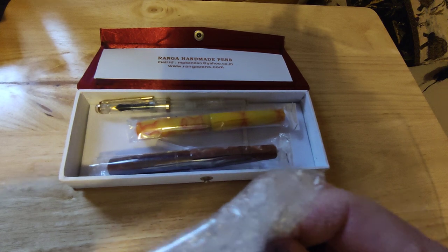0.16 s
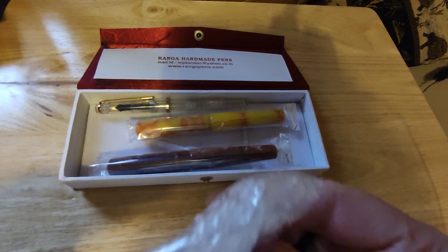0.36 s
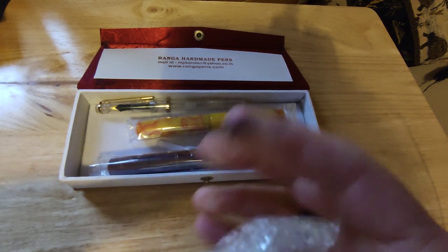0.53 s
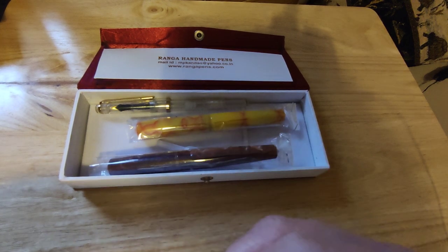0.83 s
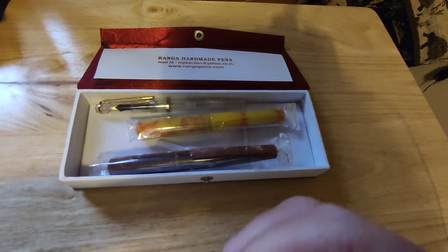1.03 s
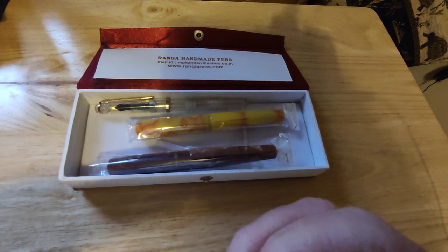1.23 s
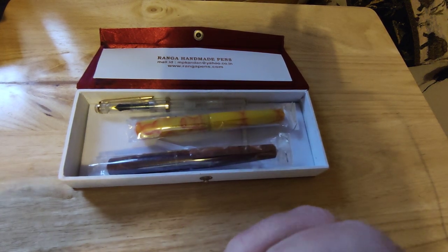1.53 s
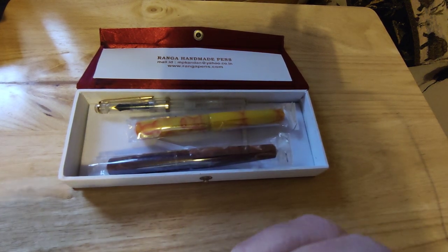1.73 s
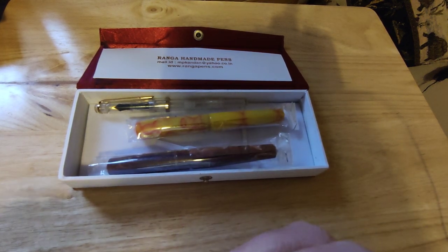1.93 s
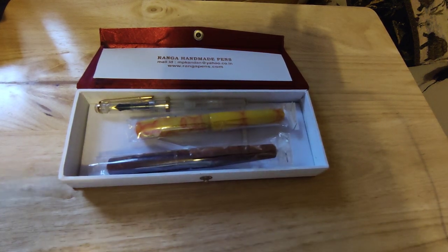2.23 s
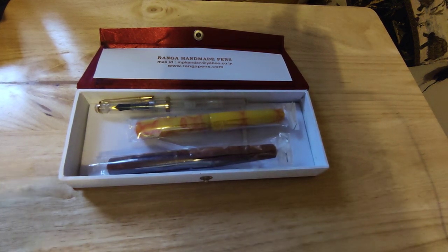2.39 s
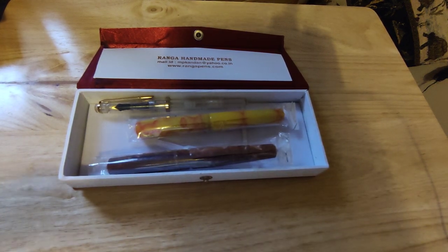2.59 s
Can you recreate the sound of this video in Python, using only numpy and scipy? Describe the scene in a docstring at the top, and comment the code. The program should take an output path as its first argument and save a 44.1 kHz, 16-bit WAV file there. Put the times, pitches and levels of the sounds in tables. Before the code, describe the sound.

Bubble wrap is handled close to the microphone in a small room. Two hard pops come first, then the plastic slides through the fingers with a fine crinkle and irregular runs of sharp snaps, over a faint low rumble.

```python
"""Bubble wrap in the hands

Close to the microphone, in a small room, the film gives two hard pops, then slides through the fingers
with a fine crinkle and one scuff while its creases buckle in runs of sharp snaps. Each pop or snap is a
click and a flutter that ring a facet of the film; the crinkle is thousands of tiny creases giving way.
Under it lie a slow swell of rumble, room tone and a faint hum."""
import sys
import numpy as np
from scipy import signal
from scipy.fft import rfft, irfft, next_fast_len
from scipy.io import wavfile

SR = 44100
rng = np.random.default_rng(int(sys.argv[2]) if len(sys.argv) > 2 else 0)


def log_audio(samples):
    """Write samples as a 16-bit WAV file to the path given in sys.argv[1]."""
    # one column per channel
    frames = np.atleast_2d(samples).T
    # limit to full scale, then quantise
    limited = np.clip(frames, -1, 1)
    pcm = np.round(limited * 32767).astype(np.int16)
    wavfile.write(sys.argv[1], SR, pcm)


N = 121275

# The hum's tones. Each row: pitch in Hz, rms level in dB.
HUM_TONES = [(53, -51), (99.7, -63.5), (221, -62.5)]
# The rumble's fader as the hands move. Each row: time in seconds, level in dB before its trim.
RUMBLE_FADER = [(0, -26), (.15, -38), (.3, -28.5), (.5, -26.5), (.65, -44), (1.05, -36), (1.45, -34),
                (1.65, -27.5), (1.8, -31), (2.08, -40), (2.33, -19.5), (2.55, -36.5), (2.75, -39)]
# The handling faders. Each row: time in seconds, then treble and low rub levels in dB before their trims.
HANDLING_FADERS = [(0, -47, -55), (.08, -49.5, -60), (.24, -50.5, -62), (.28, -47, -48), (.33, -56.5, -64),
                   (.39, -50, -59), (.44, -36.5, -59), (.48, -51, -61), (.51, -40.5, -52.5),
                   (.56, -49.5, -57), (.64, -47, -54), (.69, -37.5, -48.5), (.75, -41, -46.5),
                   (.78, -40.5, -50.5), (.87, -43, -49), (.96, -35.5, -47.5), (1.01, -42, -45.5),
                   (1.07, -33.5, -46.5), (1.14, -37.5, -44), (1.21, -35.5, -50), (1.27, -38, -45.5),
                   (1.31, -39, -46.5), (1.34, -42, -51), (1.38, -39, -47), (1.45, -49, -63),
                   (1.52, -42, -66), (1.56, -38.5, -44), (1.65, -42, -51), (1.7, -45, -61),
                   (1.76, -52, -58), (1.83, -52.5, -79), (1.9, -63, -46), (1.96, -39, -55),
                   (2.05, -53, -69), (2.14, -49, -62), (2.2, -34.5, -55), (2.29, -38, -51.5),
                   (2.39, -53.5, -66.5), (2.46, -45, -59), (2.52, -42.5, -65), (2.58, -40, -49),
                   (2.63, -46, -65), (2.75, -47, -57.5)]
# An EQ curve for each layer and for the room's tail. Each row: frequency in Hz, relative gain in dB.
RUMBLE_EQ = [(2, 0), (6, 2.5), (12, -19), (20, -15), (40, -50), (80, -49), (300, -115), (2000, -120)]
ROOM_TONE_EQ = [(15, 0.5), (35, 8), (70, -9), (100, -9.5), (170, -10), (220, -14.5), (400, -18.5),
                (1000, -19), (2200, -48), (7000, -24), (16000, -36)]
TAIL_EQ = [(100, -3.5), (300, -2), (1200, 5), (2100, -6), (3100, -0.5), (5500, -1), (7200, -1.5),
           (8500, -7.5), (9800, -1.5), (14500, -0.5), (16500, -3.5)]
RUB_EQ = [(60, 4.5), (130, 4.5), (220, 1.5), (400, 3), (700, -2), (1000, -2.5), (1400, -6), (1800, -8.5),
          (2200, -9.5), (4000, -40), (16000, -46)]
CRINKLE_EQ = [(300, -25), (1300, -12), (2100, -12.5), (2500, -7), (3300, -2), (4000, -4), (5500, -2.5),
              (7200, 1), (8500, -3.5), (9800, -3), (11500, -4), (14500, -8), (16000, -12)]
SNAP_EQ = [(100, -11.5), (250, 3), (450, 3), (800, 0.5), (1300, 4), (1750, -2.5), (2150, -16), (2550, -7),
           (3200, 1), (5000, -1.5), (6000, -5), (7400, 0), (8500, -9), (9700, 1), (11500, -1.5),
           (14500, -4.5), (16000, -19)]
POP_EQ = [(60, -3), (150, -10), (300, 2), (500, 3.5), (1000, 4), (1300, 1.5), (2000, -6.5), (3000, -2),
          (5500, 6), (7300, 2.5), (8500, -1.5), (10500, -6.5), (14500, 4.5), (16500, -14)]
# Cues for the buckling creases and the hard pops. Each row: start in seconds, crack level in dB before
# any trim, body and fizz levels in dB relative to the crack, ring pitch in Hz.
SNAP_CUES = [(0.0021, -17, -17.5, -17, 4460), (0.2564, -29, -22, -2, 6760),
             (0.3219, -46.5, -11, 6.5, 11000), (0.3497, -38.5, 1, -8, 3560), (0.3891, -37.5, -16, -1, 7160),
             (0.4112, -34.5, -4.5, -13, 3230), (0.4323, -35.5, -4, -14, 3260),
             (0.4387, -23.5, -19, -10, 6500), (0.4595, -34, -10, -3, 6860),
             (0.5994, -28.5, -34, -4.5, 6500), (0.6001, -28.5, -20, -12, 5260),
             (0.6877, -28.5, -7, -17, 6800.0), (0.7161, -29, -4.5, -15, 4300.0),
             (0.7317, -31.5, -18, -9, 7150), (0.8507, -44.5, -6, 12.5, 11000),
             (1.0282, -25.5, -16, -5, 6700.0), (1.0532, -27, -22, -5, 6400), (1.064, -14.0, -26, -19, 5940),
             (1.0735, -19, -15, -22, 3700), (1.075, -22.5, -28, -21, 4400), (1.0854, -24, -15, -16, 6450),
             (1.1521, -25.5, -5, -21, 7300.0), (1.1984, -26, -2, -4, 7500.0),
             (1.2042, -23.5, 0, -4, 7400.0), (1.2171, -25, -9, -2, 6600.0),
             (1.2456, -27.5, -11.5, -15, 6740), (1.2845, -35.5, 9, -7, 3000.0),
             (1.2964, -24.5, 0, -2, 7650), (1.3061, -27.5, -11, 0, 6940), (1.3118, -32.5, -19, 2, 7100),
             (1.4122, -38, -22, 5, 10300), (1.4241, -34.5, -15, 5, 9900.0), (1.4319, -24.0, -17, 2.5, 2900),
             (1.4758, -24.5, -14, -13, 7500), (1.504, -30.5, -13, -6, 6700), (1.5442, -19, -6.5, 5, 9000),
             (1.559, -16, -9, -3.5, 7150), (1.5724, -32, -17, 7, 9800.0), (1.5927, -22, -14, -4, 9600),
             (1.6196, -21.5, -10, -1, 7100.0), (1.6214, -19, -13.5, -1, 7100.0),
             (1.6293, -17.5, -16, -3, 7100.0), (1.6391, -18, -13, 0, 7300.0),
             (1.6512, -15.5, -10.5, -1, 6950), (1.7084, -26.5, -9, -20, 4280),
             (1.7363, -19, -7.5, -2, 5160), (1.8602, -34, -9, -1, 7100.0), (1.8687, -28, -14, -2, 7500.0),
             (1.8776, -18, -11, 1.5, 7400), (1.8809, -22.5, -7.5, 5, 9400), (1.9084, -17, -11, 0, 7600),
             (1.9196, -23.5, -13, -1.0, 4300), (1.9275, -27.5, 0.5, 7, 9700.0), (1.9471, -17, -7, -2, 7000),
             (1.9482, -20, -4, -18, 3720), (1.9988, -18.5, -10.5, -0.5, 9700),
             (2.0389, -34.5, -3, -3, 3280), (2.075, -26.5, -8.5, -2, 7340), (2.0789, -18, -10.5, -17, 3830),
             (2.081, -20, -20.5, 1.5, 8000), (2.1054, -32.5, -10, 3.5, 4200.0),
             (2.1789, -25, -9.5, -11, 4030), (2.1963, -27, -16, -13, 7840), (2.2071, -26, -15, -4, 6900.0),
             (2.2322, -31, -5.5, -4, 7100.0), (2.3023, -29.5, -14, -8, 6000), (2.3159, -28, -21, -9, 7600),
             (2.4718, -32.5, -9.5, -27, 8300), (2.5034, -23.5, -12.5, -29, 7800),
             (2.5539, -26, -18, -4.5, 5170), (2.574, -23.5, -9, -25, 4630), (2.5831, -26, -14, -22, 4800)]
POP_CUES = [(.106, -16, 4, -3, 7040), (.1338, -9.5, -4.5, -3, 2900)]

RUMBLE_TRIM_DB, RUB_TRIM_DB, HISS_TRIM_DB, CRINKLE_TRIM_DB, POP_TRIM_DB = 2, 1.5, -5.5, -2, 1
ROOM_TONE_DB, ROOM_T60_S, PREDELAY_S = -50.5, .15, .002
BODY_TOP_HZ, FIZZ_FROM_HZ = 2100, 8600   # the crack lies between them
BEND_HZ, BEND_Q = 7100, 1.5
GRAINS_PER_S, GRAIN_SPREAD_DB, CLUMP_S, CLUMP_DB = 4500, 6, .0036, 4
FACET_LOW_HZ, FACET_HIGH_HZ, FACET_Q, FACET_RING_DB = 1210, 14600, 8.3, 15.5
GRIP_SHIFT_S, GRIP_SHIFT_DB = .029, 1.5   # the grip shifts from facet to facet
FLUTTER_S, FLUTTER_SHARE, FLUTTER_FROM_HZ = .00039, .6, 1500   # the film flutters after it gives way
SNAP_RING_DB, SNAP_RING_Q = 8.5, 5.1


def from_db(db):
    """Decibels to gain."""
    return 10 ** (np.asarray(db) / 20)


def unit_rms(x):
    """Scale to an rms of 1."""
    return x / np.sqrt(np.mean(x ** 2) + 1e-20)


def faders(rows):
    """The position of each fader at every sample."""
    times, *columns = np.transpose(rows)
    return [np.interp(np.arange(N) / SR, times, column) for column in columns]


def drift(step_s, size=4096):
    """A random value every step, joined by straight lines."""
    return np.interp(np.arange(N) / SR / step_s, np.arange(size), rng.standard_normal(size))


def resonance(x, hz, q):
    """The part of a sound that rings at one pitch."""
    return signal.lfilter(*signal.iirpeak(min(hz, .45 * SR), q, fs=SR), x + 1e-18)


def three_bands(x):
    """Split a sound into low body, crack and high fizz."""
    bands = (BODY_TOP_HZ, "low"), ([BODY_TOP_HZ, FIZZ_FROM_HZ], "band"), (FIZZ_FROM_HZ, "high")
    return [signal.sosfilt(signal.butter(4, hz, kind, fs=SR, output="sos"), x + 1e-18)
            for hz, kind in bands]


def equalise(x, eq):
    """Minimum-phase EQ: nothing rings ahead of an attack."""
    size = 2 * next_fast_len(len(x))
    hz, db = np.transpose(eq)
    bin_hz = np.arange(size // 2 + 1) * SR / size
    gain = from_db(np.interp(np.log(bin_hz + 1e-9), np.log(hz), db))
    cepstrum = irfft(np.log(gain))
    cepstrum[1:size // 2] *= 2
    cepstrum[size // 2 + 1:] = 0
    return irfft(rfft(x, size) * np.exp(rfft(cepstrum)))[:len(x)]


def noise(eq):
    """Noise shaped by an EQ curve, rms 1."""
    return unit_rms(equalise(rng.standard_normal(N), eq))


def background():
    """The bed: rumble that swells as the hands move, steady room tone and hum."""
    t = np.arange(N) / SR
    hum = sum(from_db(db) * np.sqrt(2) * np.sin(2 * np.pi * (hz * t + rng.random()))
              for hz, db in HUM_TONES)
    swell_db, = faders(RUMBLE_FADER)
    rumble = from_db(swell_db + RUMBLE_TRIM_DB) * noise(RUMBLE_EQ)
    return rumble + from_db(ROOM_TONE_DB) * noise(ROOM_TONE_EQ) + hum


def in_room(x, wet_db):
    """The direct sound and a diffuse tail: the room stores each band's energy and lets it die away."""
    kept = from_db(-60 / (ROOM_T60_S * SR)) ** 2
    tail = 0
    for band, diffuse in zip(three_bands(x), three_bands(noise(TAIL_EQ))):
        energy = signal.lfilter([1 - kept], [1, -kept], band ** 2)
        tail = tail + unit_rms(diffuse) * np.sqrt(energy)
    return x + from_db(wet_db) * np.pad(tail, (int(PREDELAY_S * SR), 0))[:N]


def through_film(x):
    """Bending waves near one pitch arrive late, smearing each click."""
    return x - 2 * resonance(x, BEND_HZ, BEND_Q)


def scuff(centre_s, length_s, level_db, hz, q):
    """A fingertip scuffs the film: a short swell of friction through one resonance."""
    stroke = np.maximum(1 - (2 * (np.arange(N) / SR - centre_s) / length_s) ** 2, 0)
    friction = resonance(resonance(rng.standard_normal(N), hz, q), hz, q)
    return from_db(level_db) * stroke * unit_rms(friction)


def crinkle(facets=16):
    """Tiny creases give way in random clumps, each ringing one small facet of film; rms 1."""
    fires = rng.random(N) < GRAINS_PER_S / SR
    grain_db = CLUMP_DB * drift(CLUMP_S) + GRAIN_SPREAD_DB * np.minimum(rng.exponential(1, N), 3.3)
    grains = fires * from_db(grain_db) * rng.choice([-1, 1], N)
    facet_hit = rng.integers(0, facets, N)
    out = np.zeros(N)
    for facet, hz in enumerate(np.geomspace(FACET_LOW_HZ, FACET_HIGH_HZ, facets)):
        grip = from_db(GRIP_SHIFT_DB * drift(GRIP_SHIFT_S))
        clicks = grains * (facet_hit == facet) * grip
        out += clicks + from_db(FACET_RING_DB) * resonance(clicks, hz, FACET_Q)
    return unit_rms(equalise(through_film(out), CRINKLE_EQ))


def rustle():
    """Film slides over film and skin: a grainy crinkle, a smooth hiss and a dull rub."""
    treble_db, rub_db = faders(HANDLING_FADERS)
    grains = in_room(from_db(treble_db + CRINKLE_TRIM_DB) * crinkle(), wet_db=-18)
    hiss = from_db(treble_db + HISS_TRIM_DB) * noise(CRINKLE_EQ)
    rub = from_db(rub_db + RUB_TRIM_DB) * noise(RUB_EQ)
    return grains + hiss + rub


def snap(eq, crack_db, body_db, fizz_db, ring_hz, size=512):
    """The film gives way: a click and a short flutter spread through it and ring one facet."""
    t = np.arange(size) / SR
    flutter = rng.standard_normal(size) * np.exp(-t / FLUTTER_S) * (1 - np.exp(-2 * t / FLUTTER_S))
    flutter = signal.lfilter(*signal.butter(1, FLUTTER_FROM_HZ, "high", fs=SR), flutter)
    attack = FLUTTER_SHARE * flutter / np.linalg.norm(flutter)
    attack[0] += 1   # the click
    smeared = through_film(attack)
    ringing = smeared + (from_db(SNAP_RING_DB) - 1) * resonance(smeared, ring_hz, SNAP_RING_Q)
    bands = zip(three_bands(equalise(ringing, eq)), (body_db, 0, fizz_db))
    out = sum(from_db(crack_db + db) * band / np.linalg.norm(band) for band, db in bands)
    return out * np.sqrt(SR / 1000)   # band levels count as rms over a millisecond


def snap_run(cues, eq, slip_db, slip_lead_s=.0009):
    """A snap or pop on every cue, led by a weak slip of the film just before it gives."""
    out = np.zeros(N + SR)
    for cue_s, *voicing in cues:
        for lead_s, db in ((slip_lead_s * rng.uniform(.4, 1.6), slip_db), (0, 0)):
            hit = from_db(db) * snap(eq, *voicing)
            start = max(int((cue_s - lead_s) * SR), 0)
            out[start:start + len(hit)] += hit
    return out[:N]


def scene():
    """The mono mix: pops and snapping creases up front, scuff and rustle behind, the bed underneath."""
    pops = from_db(POP_TRIM_DB) * in_room(-snap_run(POP_CUES, POP_EQ, slip_db=-23), wet_db=-9)
    creases = in_room(snap_run(SNAP_CUES, SNAP_EQ, slip_db=-12.5), wet_db=-13)
    fingertip = scuff(centre_s=.284, length_s=.045, level_db=-49.5, hz=2740, q=3.5)
    return (pops + creases + fingertip + rustle() + background())[None]


def record(dry, dip_db=-1.5, cutoff_hz=15900):
    """The microphone scoops the upper mids a little, clips the loudest peaks and cuts the very top."""
    scooped = dry + (from_db(dip_db) - 1) * resonance(dry, hz=2180, q=6.3)
    high_cut = signal.ellip(12, .2, 95, cutoff_hz, fs=SR, output="sos")
    return signal.sosfilt(high_cut, np.clip(scooped, -1, 1))


dry = scene()
out = record(dry)
log_audio(out)
```